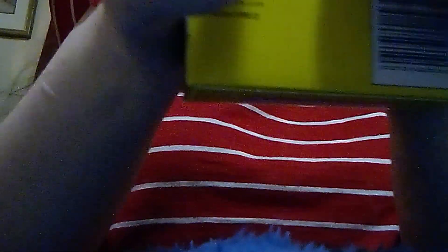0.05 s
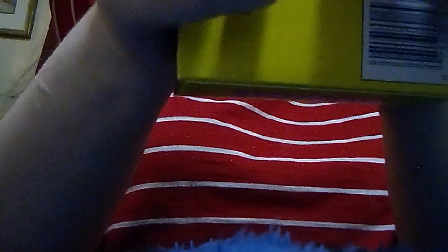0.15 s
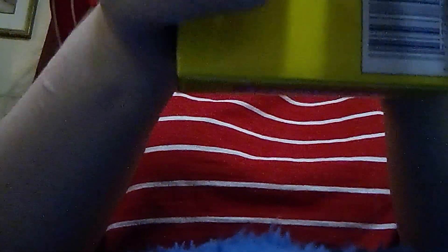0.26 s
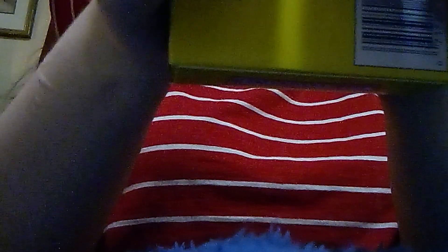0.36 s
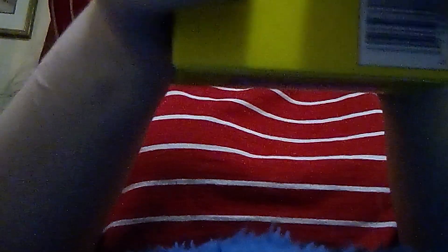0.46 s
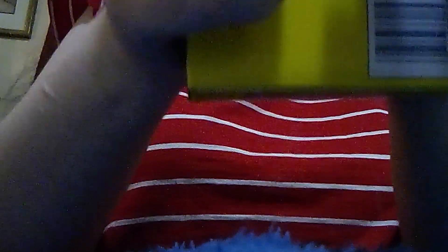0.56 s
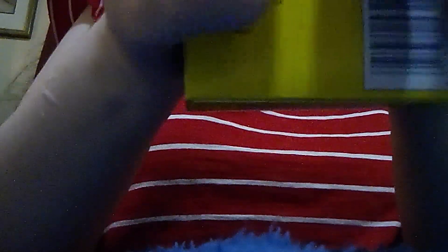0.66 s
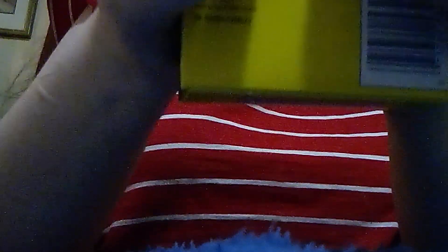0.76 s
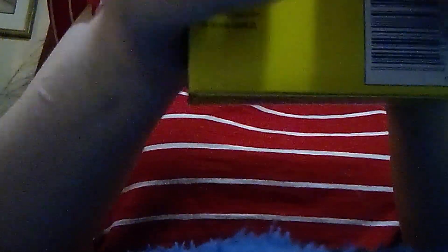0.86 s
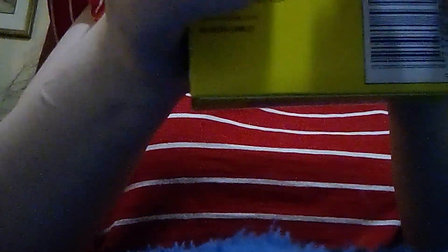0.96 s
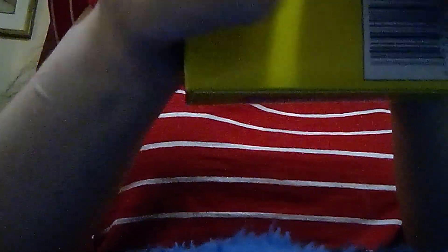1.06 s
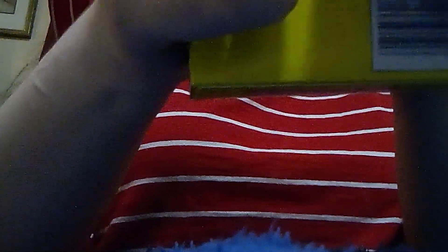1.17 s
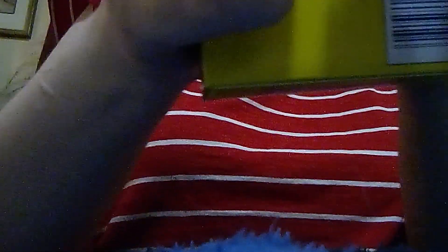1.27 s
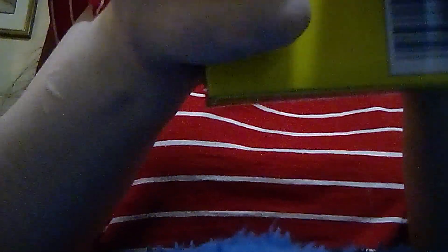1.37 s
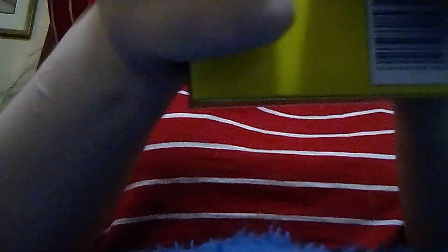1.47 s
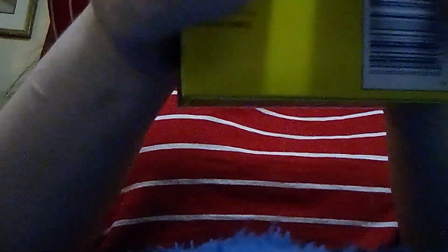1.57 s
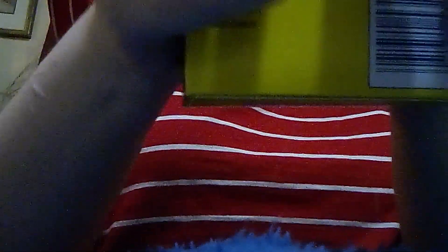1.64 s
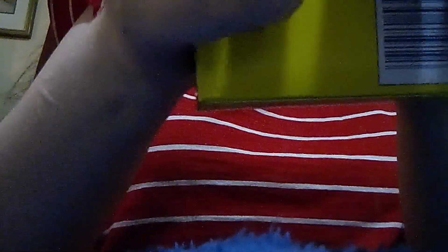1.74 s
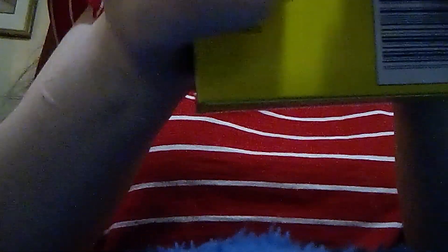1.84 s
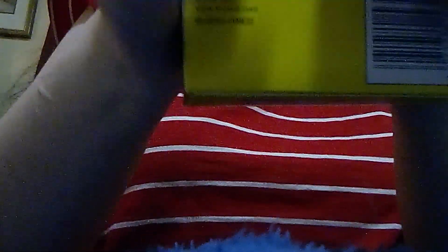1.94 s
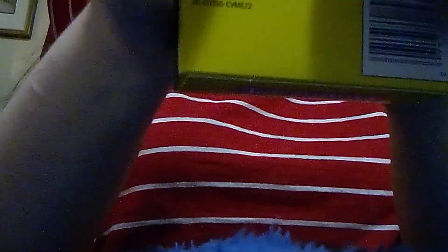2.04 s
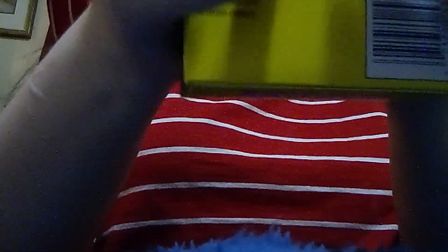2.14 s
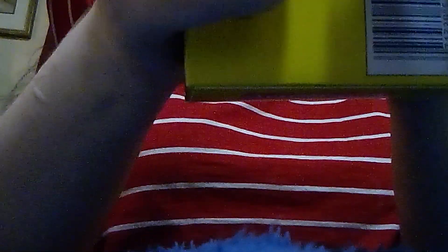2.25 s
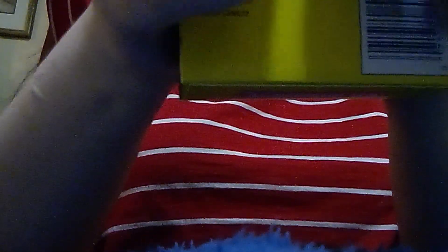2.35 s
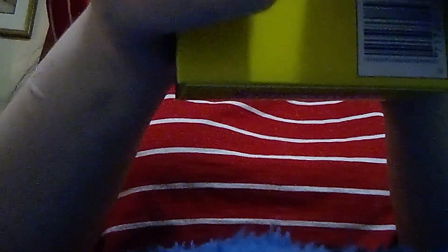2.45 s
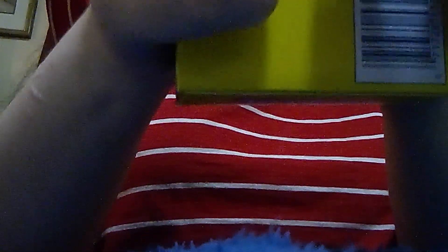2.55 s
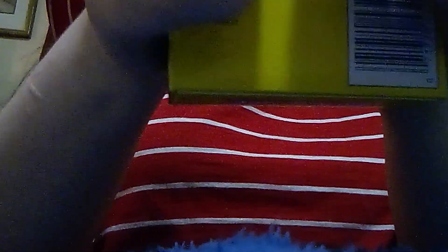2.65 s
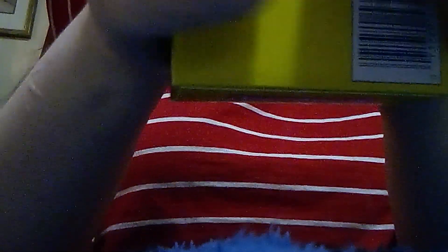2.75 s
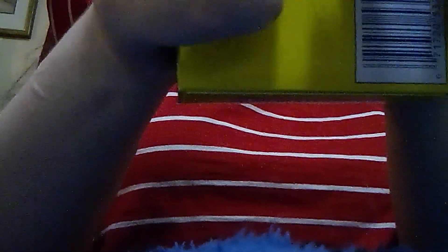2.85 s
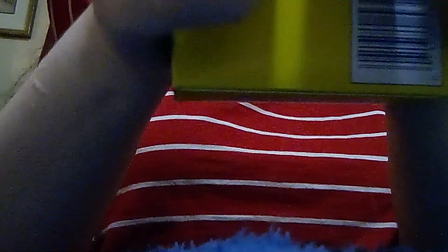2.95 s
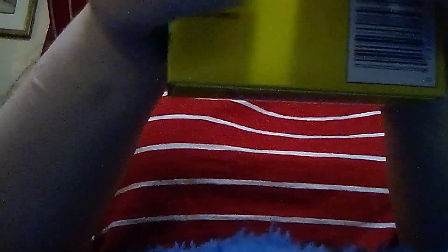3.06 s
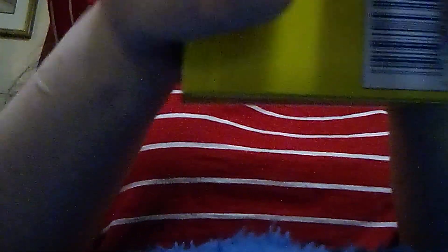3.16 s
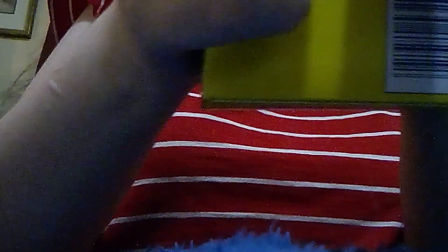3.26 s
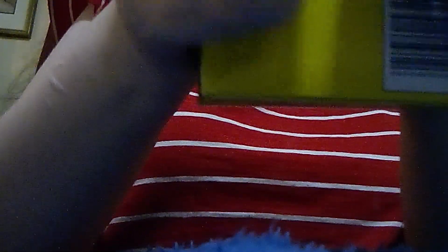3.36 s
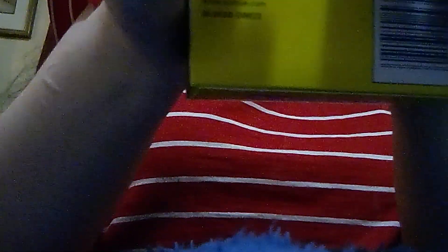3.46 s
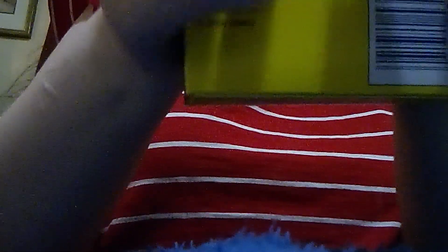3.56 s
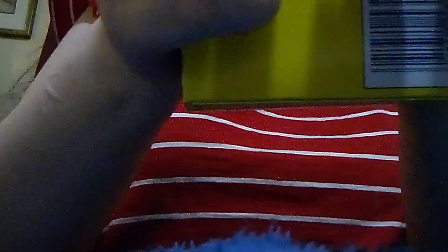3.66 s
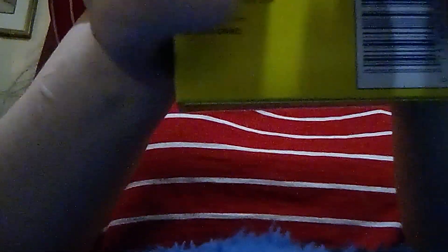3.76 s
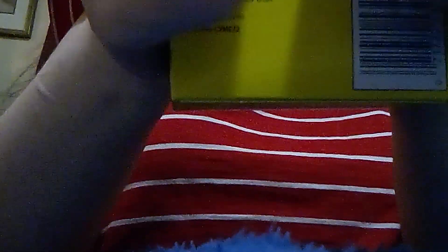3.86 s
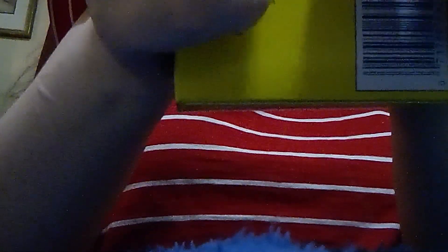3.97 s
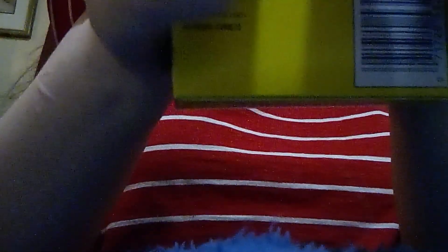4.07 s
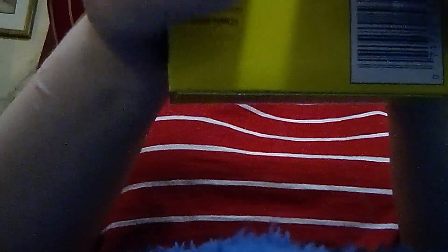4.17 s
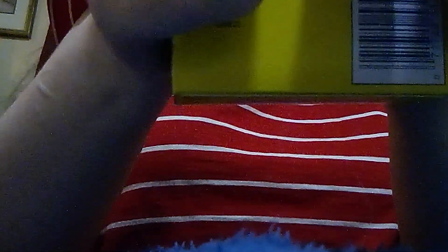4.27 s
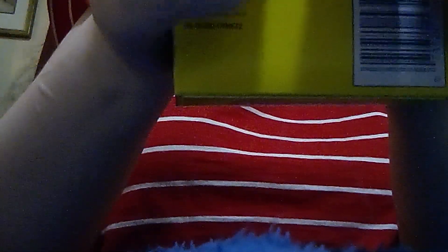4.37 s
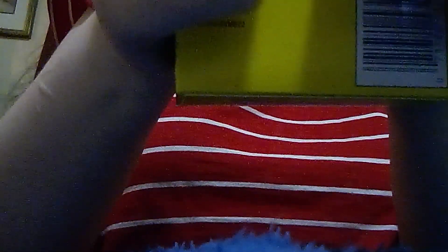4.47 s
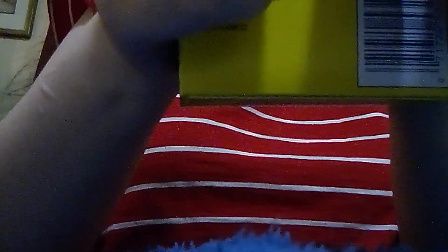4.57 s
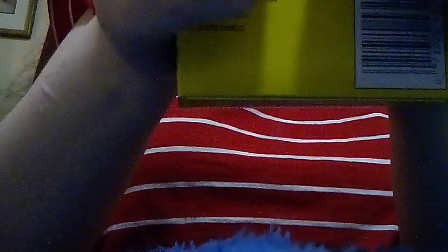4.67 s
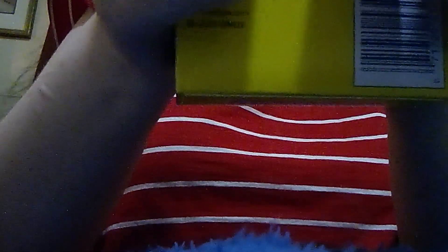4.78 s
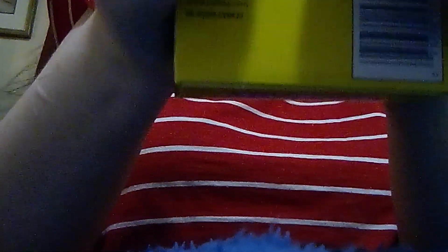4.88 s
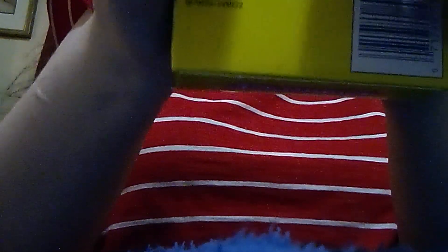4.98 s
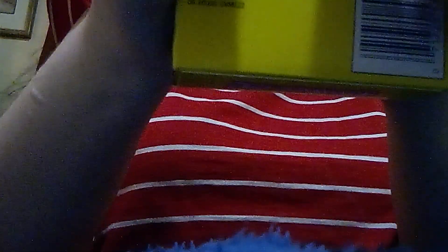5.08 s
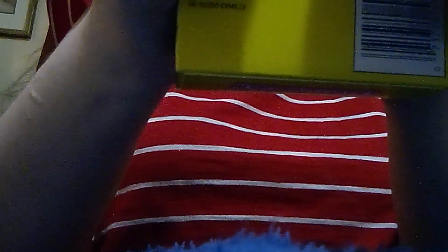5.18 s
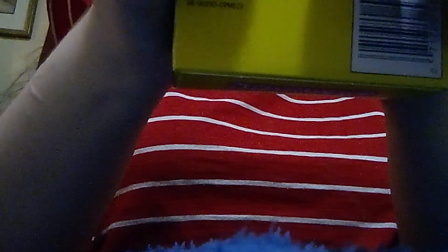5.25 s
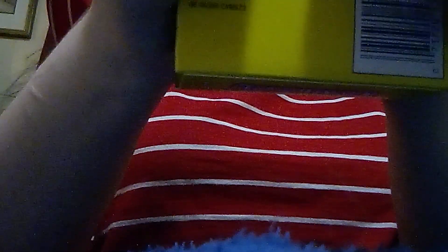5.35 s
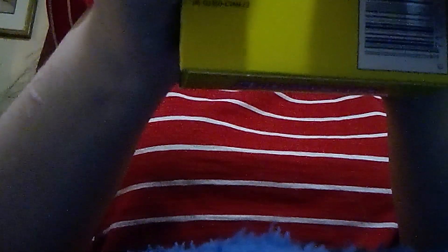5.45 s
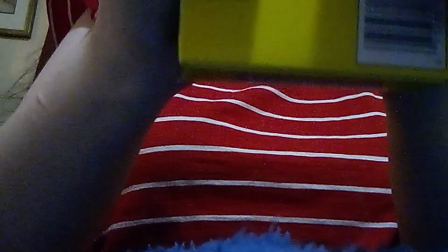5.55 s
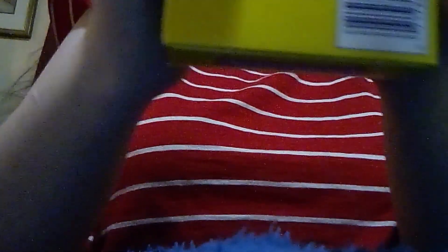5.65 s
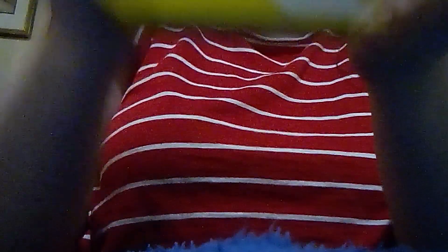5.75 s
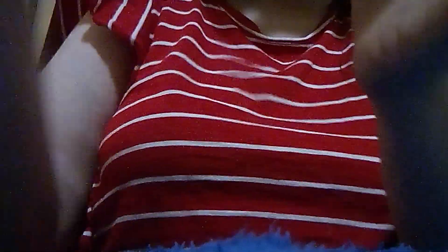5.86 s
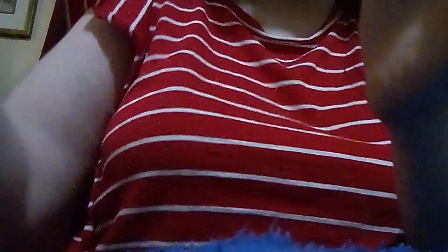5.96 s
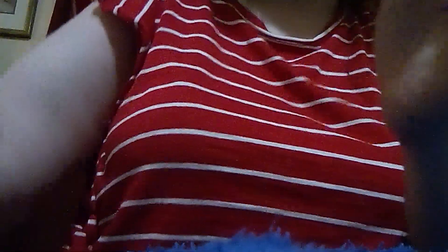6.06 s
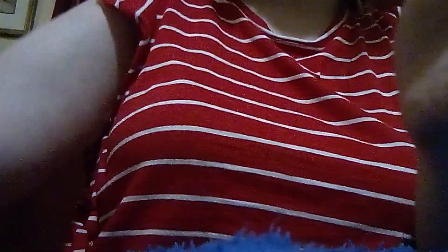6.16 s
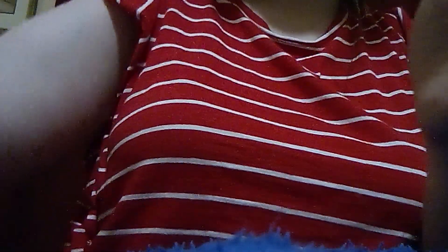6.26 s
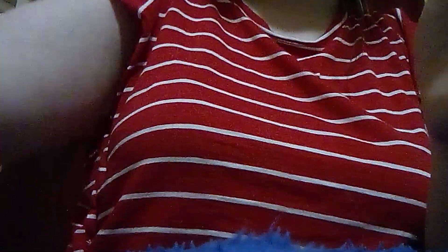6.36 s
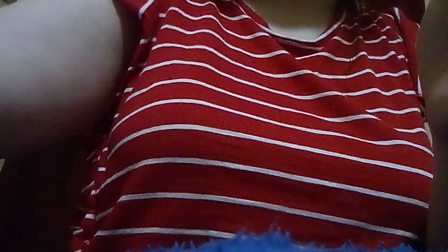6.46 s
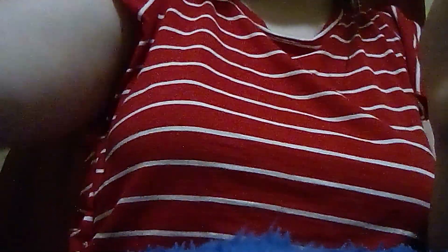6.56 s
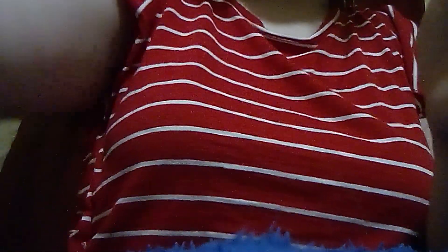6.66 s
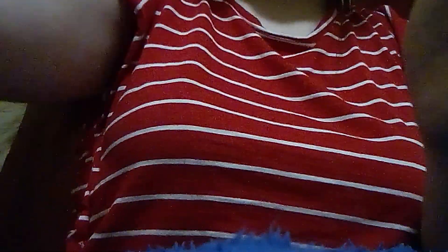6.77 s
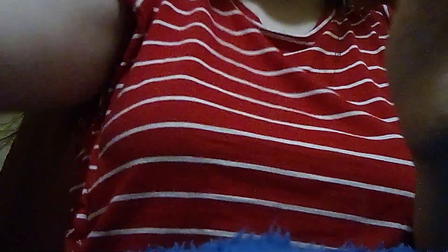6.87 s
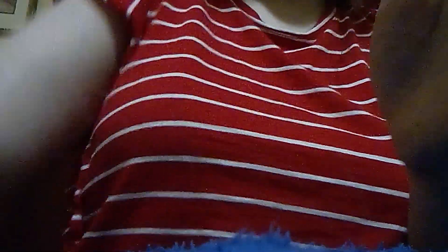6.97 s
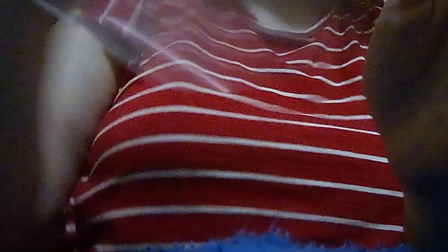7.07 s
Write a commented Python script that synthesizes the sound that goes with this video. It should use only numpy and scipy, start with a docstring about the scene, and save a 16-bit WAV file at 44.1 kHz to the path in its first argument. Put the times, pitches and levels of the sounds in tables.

```python
"""Throughout, a motor note beats against mains hum in a quiet room, over soft noise.
From the start to 5.7 s, fingers drum on a small cardboard box close by, in rolls and single taps.
Each tap knocks the lid, flexes the walls, pumps the enclosed air and ticks a nail on the coated card.
A soft rub comes with the first taps and a fingertip squeaks at 1.6 s.
From 5.6 s skin and sleeve rub softly, with three more squeaks; the strongest rub comes at 6.8 s."""
import sys
import numpy as np
from scipy import signal
from scipy.fft import rfft, irfft, next_fast_len
from scipy.io import wavfile
from scipy.ndimage import uniform_filter1d

SR = 44100
rng = np.random.default_rng(int(sys.argv[2]) if len(sys.argv) > 2 else 0)


def wav_out(sig):
    """Save sig, one row per channel (or a flat mono array), as 16-bit PCM at SR to the path in sys.argv[1]."""
    wavfile.write(sys.argv[1], SR, np.round(np.clip(np.atleast_2d(sig).T, -1, 1) * 32767).astype(np.int16))


N = 313992

# reference tap; lower spots lie mid-panel, higher ones near a stiff edge
USUAL_DB, USUAL_HZ, USUAL_GIVE_DB = -36, 1050, -12


def amp(db):
    """Amplitude factor of a level in dB."""
    return 10 ** (np.asarray(db) / 20)


def unit(x):
    """x at rms 1."""
    return x / np.sqrt(np.mean(x ** 2) + 1e-20)


def blow(x):
    """x with the energy of 10 ms at rms 1."""
    return x / np.sqrt(np.sum(x ** 2) / (SR / 100) + 1e-20)


def along(points, hz):
    """(Hz, value) points interpolated on a log frequency axis."""
    point_hz, value = np.transpose(points)
    return np.interp(np.log(hz + 1), np.log(point_hz + 1), value)


def band(x, lo_hz, hi_hz, order=1):
    """Causal Butterworth band-pass."""
    b, a = signal.butter(order, [lo_hz, hi_hz], "band", fs=SR)
    return signal.lfilter(b, a, x)


def filtered(x, response):
    """x times a response of frequency."""
    size = next_fast_len(N + SR // 4)
    hz = np.fft.rfftfreq(size, 1 / SR)
    return irfft(rfft(x, size) * response(hz), size)[:N]


def noise(spectrum):
    """Coloured noise of rms 1."""
    white = rng.standard_normal(N)
    return unit(filtered(white, lambda hz: amp(along(spectrum, hz))))


def click(db, size=512):
    """Minimum-phase pulse whose spectrum is the function db of frequency."""
    cepstrum = irfft(np.log(amp(db(np.fft.rfftfreq(size, 1 / SR)))))
    # fold the cepstrum to positive time
    cepstrum[1:size // 2] *= 2
    cepstrum[size // 2 + 1:] = 0
    return irfft(np.exp(rfft(cepstrum)))


def fade(t, t60):
    """Exponential decay of 60 dB in t60 [s]."""
    return np.exp(-np.log(1000) * t / t60)


def ring(t, hz, t60):
    """One struck mode: a decaying sine."""
    return np.sin(2 * np.pi * hz * t) * fade(t, t60)


def scatter(t, t60, delay):
    """Dense random reflections of energy 1, silent until delay [s], fully open at twice that."""
    onset = np.clip(t / delay - 1, 0, 1)
    tail = rng.standard_normal(len(t)) * fade(t, t60) * onset
    return tail / (np.linalg.norm(tail) + 1e-12)


def add(track, s, sound):
    """Mix a sound into a track at time s."""
    part = track[max(round(s * SR), 0):][:len(sound)]
    part += sound[:len(part)]


def background(noise_db=-65.5, waver_db=1.5):
    """The motor note beats against the mains hum, each partial wavering slowly, over room noise."""
    # motor harmonics and mains hum: (frequency [Hz], rms level before waver [dB])
    hum_partials = [(106.87, -57), (120.03, -63.5), (213.7, -70), (427.2, -77), (546.9, -80)]
    # air and hiss of the quiet room: (frequency [Hz], relative density [dB per Hz])
    room_spectrum = [(25, -14), (55, -6.5), (85, -2), (180, 3), (250, -8), (350, -1), (560, -7.5),
                     (850, -11), (1300, -13.5), (3200, -23), (6200, -25.5), (8500, -41.5), (13800, -53),
                     (15200, -46), (16500, -38)]
    t = np.arange(N) / SR
    out = amp(noise_db) * noise(room_spectrum)
    for hz, db in hum_partials:
        waver = np.interp(t, np.linspace(0, t[-1], num=16), rng.standard_normal(size=16))
        sine = np.sqrt(2) * np.sin(2 * np.pi * (hz * t + rng.random()))  # rms 1
        out += amp(db + waver_db * waver) * sine
    return out


def room(x, count=24, delay_s=0.008):
    """The room answers with a diffuse tail, redrawn for each of count equal stretches of x."""
    # reverberation: (frequency [Hz], t60 [s])
    decay = [(150, 0.42), (500, 0.17), (1500, 0.095), (5000, 0.2), (12000, 0.016)]
    out = np.zeros(N)
    edges = np.linspace(0, N, count + 1).astype(int)
    for start, end in zip(edges, edges[1:]):
        hz, t, z = signal.stft(rng.standard_normal(SR // 4), SR, nperseg=256)
        t60_s = along(decay, hz)[:, None]
        tail = signal.istft(z * fade(t, t60_s), SR, nperseg=256)[1]
        tail /= np.linalg.norm(tail)
        add(out, start / SR + delay_s, signal.fftconvolve(x[start:end], tail))
    return out


def rubs(grain_db=2.5):
    """Skin and sleeve rub in short swells of friction noise, grainy where the surfaces catch."""
    # swells: (peak time [s], half length to 1/e [s], scuff level [dB], hiss level [dB])
    swells = [(0.033, 0.011, -49, -76), (5.602, 0.028, -61.5, -78), (5.719, 0.025, -57, -76),
              (5.79, 0.029, -64.5, -75), (5.838, 0.021, -63, -56.5), (6.796, 0.022, -44.5, -64.5),
              (6.96, 0.0084, -77, -75)]
    # low part of the rub: (frequency [Hz], relative density [dB per Hz])
    scuff_spectrum = [(88, -45.5), (150, -15.5), (163, -43), (328, -2), (524, -1), (708, -8), (1030, -5),
                      (4000, -34.5), (5200, -45), (8800, -120)]
    # high part of the rub: (frequency [Hz], relative density [dB per Hz])
    hiss_spectrum = [(1470, -37), (2500, -8), (3650, -12), (4180, -10), (6050, -2), (10400, -32),
                     (15200, -19), (16500, -34)]
    t = np.arange(N) / SR
    catches = unit(uniform_filter1d(rng.standard_normal(N), size=90))
    grain = unit(amp(grain_db * catches))
    scuff, hiss = noise(scuff_spectrum), noise(hiss_spectrum)
    out = np.zeros(N)
    for s, half_s, scuff_db, hiss_db in swells:
        swell = np.exp(-((t - s) / half_s) ** 2)
        out += swell * (amp(scuff_db) * scuff + amp(hiss_db) * hiss)
    return grain * out


def squeaks(width=0.12):
    """A fingertip slips on the gloss; each slip excites one narrow resonance of the card."""
    # slips: (peak time [s], half length to 1/e [s], pitch [Hz], level [dB])
    slips = [(1.6, 0.0092, 1440, -50.5), (5.721, 0.019, 1700, -64.5), (5.782, 0.0056, 1570, -62),
             (5.846, 0.0096, 1175, -47)]
    out, t = np.zeros(N), np.arange(SR // 5) / SR
    middle_s = t[-1] / 2
    for s, half_s, hz, db in slips:
        friction = rng.standard_normal(len(t))
        tone = unit(band(friction, hz / (1 + width), hz * (1 + width), order=2))
        swell = np.exp(-((t - middle_s) / half_s) ** 2)
        add(out, s - middle_s, amp(db) * tone * swell)
    return out


def settling(t, db=-23, mean_delay_s=0.015, count=4):
    """Pulse train of a finger settling in a few tiny slips, weaker the later they come."""
    slips = np.zeros(len(t))
    delays_s = 0.0039 + rng.exponential(mean_delay_s, count)
    for delay_s, size in zip(delays_s, rng.standard_normal(count)):
        add(slips, delay_s, np.array([amp(db) * size * fade(delay_s, 0.19)]))
    return slips


def papery_wash(t, t60=0.089, attack_s=0.0024):
    """The tick spreads through the fibres of the card as a smooth, short hiss."""
    hiss = band(rng.standard_normal(len(t)), lo_hz=1480, hi_hz=5960, order=3)
    return blow(hiss * fade(t, t60) * (1 - np.exp(-t / attack_s)))


def air_thump(t, detune=0.098):
    """The card is pushed inwards, so the air starts with a suction; the grip shifts its pitch."""
    # enclosed air with the largest panels: (frequency before detuning [Hz], relative level [dB], t60 [s])
    air_modes = [(125.3, 5, 0.14), (153.5, 5, 0.079), (186, -15, 0.037)]
    breath = np.zeros(len(t))
    for hz, db, t60 in air_modes:
        breath += amp(db) * ring(t, hz * np.exp(detune * rng.standard_normal()), t60)
    return -blow(band(breath, lo_hz=59.0, hi_hz=486, order=2))


def wall_flex(t, pitch_hz, ratio=1.335, partner_db=-6):
    """A limp wall bends in one main mode, flanked by two damped ones of random strength."""
    main = ring(t, pitch_hz, t60=0.028)
    flanks = ring(t, pitch_hz * ratio, t60=0.033) - ring(t, pitch_hz / ratio, t60=0.017)
    modes = main + amp(partner_db) * rng.standard_normal() * flanks
    return blow(band(modes, lo_hz=161, hi_hz=990))


def walls(t, spot_hz, detune=0.14, spread_db=2):
    """Both walls flex, balanced by the struck spot; the grip shifts them from tap to tap."""
    # two kinds of side wall, before scatter:
    # (frequency [Hz], relative level [dB], lean [dB per octave of spot pitch])
    wall_modes = [(282, -5.5, -2), (545, -6.5, 0)]
    octaves = np.log2(spot_hz / USUAL_HZ)
    out = np.zeros(len(t))
    for hz, db, lean in wall_modes:
        level_db = db + lean * octaves + spread_db * rng.standard_normal()
        pitch_hz = hz * np.exp(detune * rng.standard_normal())
        out += amp(level_db) * wall_flex(t, pitch_hz)
    return out


def nail_tick(t, tilt_db, grit=0.34, ripple_db=3.5, count=36):
    """A sharp contact coloured by its spot, then duller grit as the nail skids."""
    # nail on coated card, before ripple and tilt: (frequency [Hz], relative density [dB per Hz])
    nail_spectrum = [(1200, -11), (2300, 0), (3300, -6.5), (4200, -1.5), (5000, -6), (5900, -7),
                     (6550, -2.5), (7600, -13), (8700, -19), (9400, -18.5), (13500, -32.5), (14900, -25),
                     (16500, -37)]
    ripple = ripple_db * rng.standard_normal(count)
    ripple_hz = np.linspace(0, SR / 2, count)

    def nail_db(hz):
        """Spectrum of the contact: nail, spot ripple and tilt."""
        spot = np.interp(hz, ripple_hz, ripple)
        return along(nail_spectrum, hz) + spot + tilt_db * np.log2(1 + hz / 1500)

    nail = click(nail_db)
    skid = rng.standard_normal(len(t)) * fade(t, 0.0095)
    force = grit * band(skid, lo_hz=1110, hi_hz=6320, order=2)
    force[0] += 1
    return blow(signal.fftconvolve(force, nail)[:len(t)])


def lid_knock(t, pitch_hz, reach_octaves=0.38, spread_db=3.5, detune=0.078):
    """The struck spot favours the lid modes near one pitch; the resting finger detunes them."""
    # bending modes, before scatter: (frequency [Hz], relative level [dB], t60 [s])
    lid_modes = [(634, -17, 0.11), (784, -4, 0.019), (898, 1, 0.012), (1172, 2, 0.017), (1417, 3, 0.011),
                 (1663, 10.5, 0.019), (1920, 8, 0.015)]
    hz, db, t60 = np.transpose(lid_modes)[:, :, None]
    hz = hz * np.exp(detune * rng.standard_normal(hz.shape))
    near = np.exp(-.5 * (np.log2(hz / pitch_hz) / reach_octaves) ** 2)
    strength = near * amp(db + spread_db * rng.standard_normal(hz.shape))
    modes = np.sum(strength * ring(t, hz, t60), axis=0)
    return blow(band(modes, lo_hz=665, hi_hz=2220))


def touch_db(law, strength_db, spot_hz, give_db):
    """Level of one part of a tap, from how hard and where the finger lands."""
    usual_db, per_db, per_octave, per_give = law
    harder = per_db * (strength_db - USUAL_DB)
    higher = per_octave * np.log2(spot_hz / USUAL_HZ)
    limper = per_give * (give_db - USUAL_GIVE_DB)
    return usual_db + harder + higher + limper


def taps(firm_db=-45, brighten=1.0, pad_lag_s=0.001, recover_s=0.021):
    """Every contact sounds lid, wall, air and nail, and rattles around inside the box."""
    # (time [s], strength [dB], struck spot pitch [Hz], wall give over the lid knock [dB])
    tap_list = [(0.022, -52, 1130, -8.5), (0.0274, -48.5, 1280, 4), (.082, -39.5, 1620, -15),
                (0.1018, -36, 1560, 3), (0.111, -47, 900, 5), (.2599, -29.5, 1000, -8.5),
                (0.306, -46.5, 1010, -21), (.367, -39, 870, -11.5), (0.4167, -34, 890, -14),
                (.452, -34.5, 830, -7.5), (.4615, -35, 1480, 2), (.486, -36, 1020, -1),
                (0.5447, -44, 1660, -7), (.576, -30.5, 1390, 1.5), (.602, -30.5, 1110, -27),
                (0.6762, -34.5, 880, -11), (.6947, -34, 920, -11), (0.7806, -38, 1170, 0.5),
                (0.831, -33.5, 1170, -4.5), (.866, -34, 1770, 3), (0.9087, -32, 1090, -2),
                (.9397, -35.5, 1120, -27), (.9726, -30.5, 940, -12), (1.0548, -32, 1220, -8.5),
                (1.142, -39.5, 875, 2.5), (1.1782, -30, 1160, -11), (1.192, -35.5, 1360, 4.5),
                (1.2133, -34, 1530, 1), (1.2293, -32.5, 990, -7.5), (1.287, -37, 820, -23),
                (1.349, -37.5, 950, -23), (1.4462, -40, 980, -22), (1.4662, -34.5, 1190, -19),
                (1.4876, -37, 1140, 7), (1.5116, -33.5, 1180, -6), (1.5413, -37, 1360, 3),
                (1.765, -28, 1000, -10), (1.781, -31.5, 1030, -17), (1.7999, -41, 1160, 7.5),
                (1.823, -37.5, 950, -3), (1.9171, -29, 930, -15), (1.9255, -39, 870, -3),
                (2.0839, -32.5, 1050, 0.5), (2.092, -34.5, 1480, -3), (2.104, -38, 940, 3),
                (2.1174, -44.5, 1530, -4), (2.2388, -28, 970, -9), (2.3537, -38.5, 910, -14),
                (2.4019, -33.5, 880, -15), (2.42, -45.5, 920, 12.5), (2.4285, -38, 1070, 1),
                (2.4783, -38.5, 1570, 1.5), (2.513, -38, 1480, 2), (2.5206, -43, 1470, 6),
                (2.5485, -31.5, 1200, -0.5), (2.5747, -32.5, 1150, -24), (2.647, -30, 870, -24),
                (2.7194, -38.5, 1070, -9.5), (2.7551, -38, 1040, 1), (2.7653, -40, 1280, -5),
                (2.7763, -34, 1140, -7), (2.7864, -35.5, 1530, 3.5), (2.8917, -29.5, 990, -5.5),
                (2.9186, -33.5, 1000, -26), (2.9677, -36.5, 870, -28), (3.0331, -31, 895, -9),
                (3.0789, -40.5, 860, 1), (3.0897, -47.5, 1300, 6), (3.1122, -35, 1360, -2),
                (3.1256, -37, 1420, 4), (3.2114, -30, 1030, -14), (3.2422, -37, 1050, -16),
                (3.3035, -35, 870, -10), (3.3594, -32.5, 890, -7.5), (3.397, -41, 1100, 1.5),
                (3.4511, -40, 1500, -6), (3.4706, -34, 1490, 0.5), (3.7019, -44.5, 1510, -1),
                (3.7127, -29.5, 1030, -18.5), (3.7433, -33, 915, -11), (3.8474, -33, 1050, -4),
                (3.9523, -34, 1170, -2.5), (3.9651, -36.5, 825, 9.5), (3.9765, -34.5, 1210, -1),
                (4.0202, -32.5, 1510, 0.5), (4.0543, -35, 1150, -7.5), (4.092, -30, 950, -23),
                (4.1355, -37, 1130, -10), (4.229, -40, 1120, 1), (4.2396, -39.5, 1100, 2.5),
                (4.3176, -34, 1510, -1), (4.3312, -33.5, 1190, -5.5), (4.387, -36.5, 970, -37),
                (4.457, -36.5, 1060, -28), (4.483, -47, 1180, 4.5), (4.4986, -40, 1060, 0),
                (4.5339, -41.5, 1720, 4.5), (4.6052, -34, 1170, -6), (4.625, -33.5, 1110, -28),
                (4.6813, -35.5, 920, -47), (4.7552, -35, 1010, -14), (4.7664, -40.5, 1200, -1.5),
                (4.7786, -38, 900, 6), (4.8972, -33, 1160, -1), (4.9126, -42.5, 1070, -8),
                (4.942, -44, 1160, -50), (4.9868, -47.5, 930, 4), (5.0364, -39, 1630, -3),
                (5.1888, -32.5, 1050, -12), (5.2204, -42, 836, 1), (5.2432, -35.5, 1100, -10),
                (5.2509, -45.5, 775, -2), (5.3414, -41, 1650, -8), (5.4521, -41, 1500, -1.5),
                (5.4605, -33, 1050, -30), (5.4721, -35.5, 1090, -8.5), (5.4934, -39.5, 1080, -39),
                (5.5693, -44, 1310, -15), (5.6328, -38, 1000, 5), (5.699, -51.5, 990, 0)]
    # finger angle, steeper is brighter: (time [s], nail tilt before brightening [dB per octave])
    nail_tilt = [(0, 1.8), (1.3, 0.5), (2, 0), (2.8, 2.3), (4.2, 1), (4.9, 3), (5.2, -1.5), (5.5, 4),
                 (5.63, 9.5)]
    # air and nail laws: (reference tap level [dB], slope [dB per dB of strength],
    # slope [dB per octave of spot pitch], slope [dB per dB of wall give])
    thump_law = (-37.5, 0.9656, -6, 0)
    tick_law = (-47, 0.7331, 3, 0.095)
    out, t = np.zeros(N), np.arange(SR // 8) / SR
    # the soft pad pushes walls and air just after the nail lands
    pad_t = np.maximum(t - pad_lag_s, 0)
    pauses_s = np.diff([row[0] for row in tap_list], prepend=-1)
    for (s, strength_db, spot_hz, give_db), pause_s in zip(tap_list, pauses_s):
        # pressed card springs back slowly, so the next tap in a roll pumps less air
        recovered = 1 - np.exp(-pause_s / recover_s)
        thump_db = touch_db(thump_law, strength_db, spot_hz, give_db)
        thump = recovered * amp(thump_db) * air_thump(pad_t)
        wall = amp(strength_db + give_db) * walls(pad_t, spot_hz)
        lid = amp(strength_db) * lid_knock(t, spot_hz)
        # a harder nail contact is shorter, hence brighter
        tick_db = touch_db(tick_law, strength_db, spot_hz, give_db)
        tilt_db = np.interp(s, *np.transpose(nail_tilt)) + brighten * (tick_db - firm_db)
        tick = amp(tick_db) * nail_tick(t, tilt_db)
        # mostly the low part of the knock lingers in the closed box
        lingering = amp(-4.5) * band(lid + wall, lo_hz=248, hi_hz=890, order=2)
        inside = signal.fftconvolve(lingering, scatter(t, t60=0.049, delay=0.0015))[:len(t)]
        wash = amp(tick_db - 16.0) * papery_wash(t)
        slips = signal.fftconvolve(lid + tick, settling(t))[:len(t)]
        add(out, s, lid + wall + tick + inside + wash + slips + thump)
    return out


def scene():
    """The box up close, with a little room around it."""
    box = taps() + rubs() + squeaks()
    return (box + amp(-20) * room(box) + background())[None]


def record(dry, top_hz=16800):
    """The recorder keeps nothing above its band limit."""
    return np.array([filtered(channel, lambda hz: hz < top_hz) for channel in dry])


dry = scene()
out = record(dry)
wav_out(out)
```